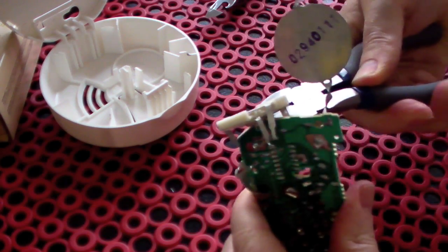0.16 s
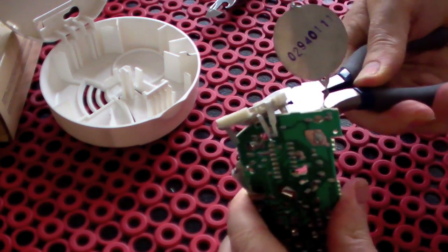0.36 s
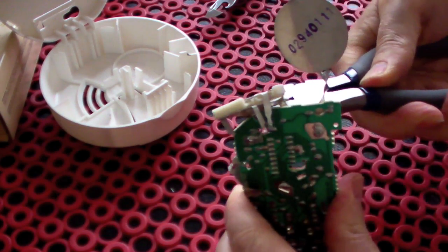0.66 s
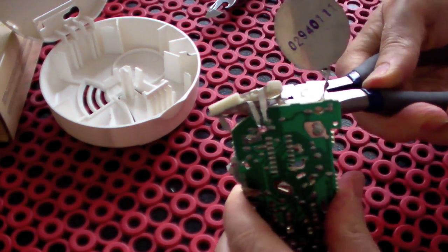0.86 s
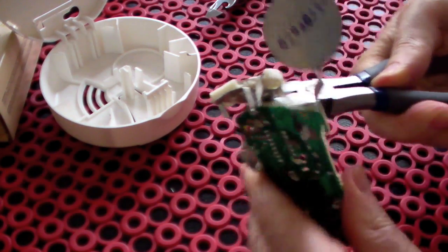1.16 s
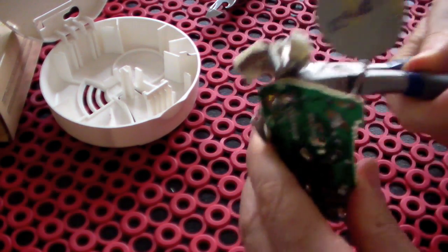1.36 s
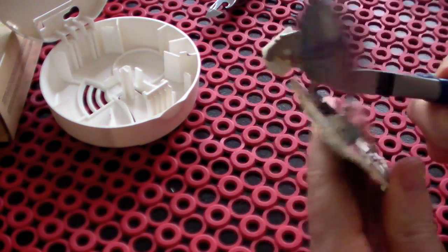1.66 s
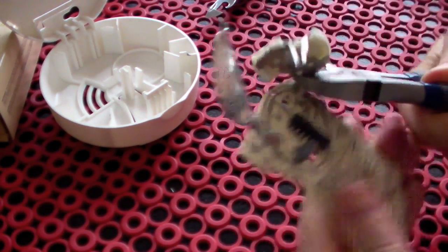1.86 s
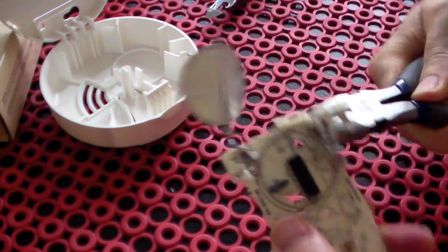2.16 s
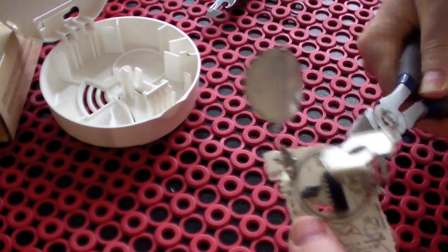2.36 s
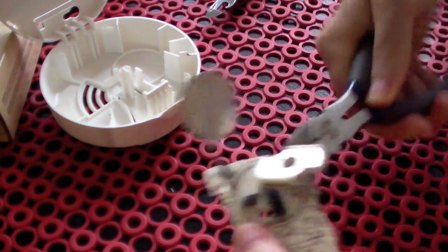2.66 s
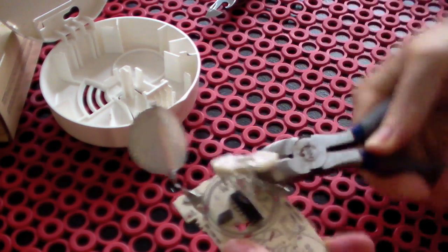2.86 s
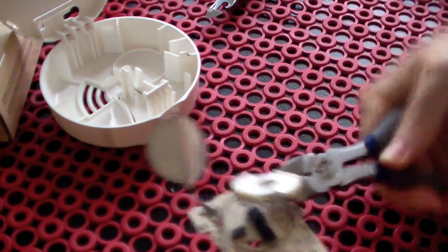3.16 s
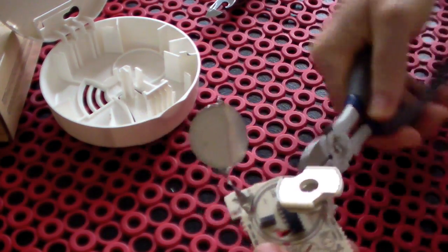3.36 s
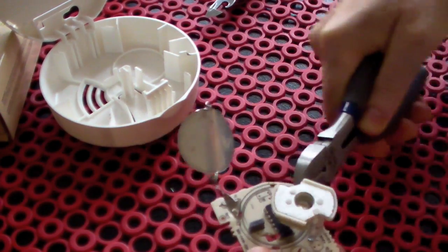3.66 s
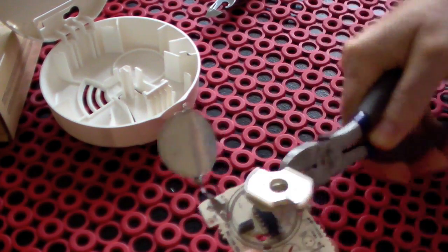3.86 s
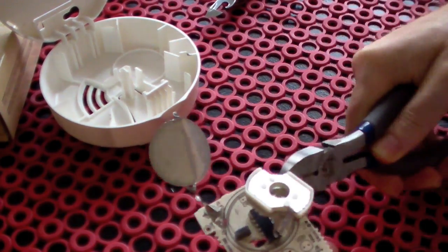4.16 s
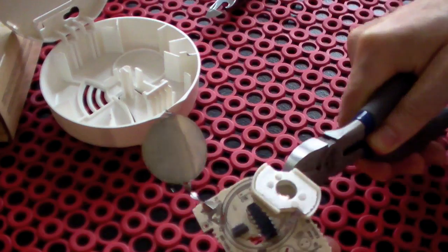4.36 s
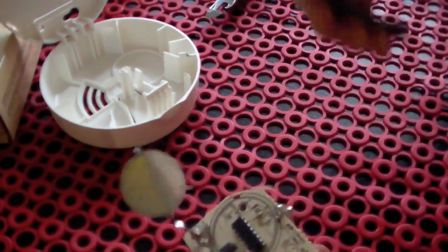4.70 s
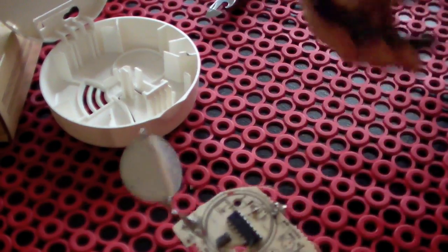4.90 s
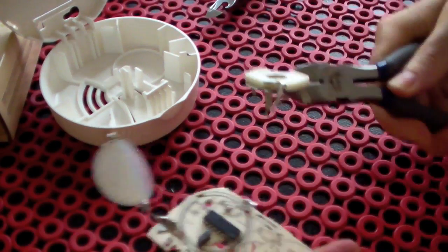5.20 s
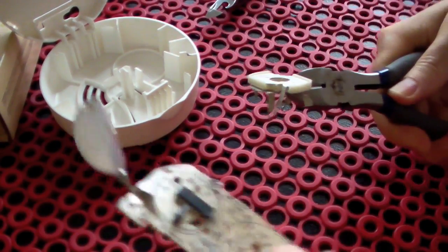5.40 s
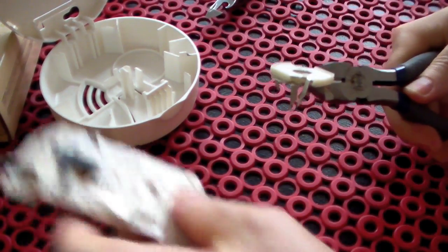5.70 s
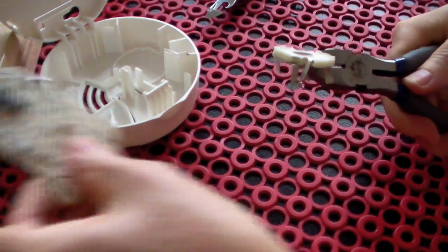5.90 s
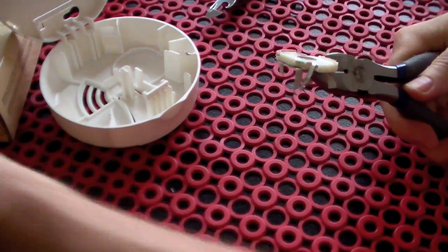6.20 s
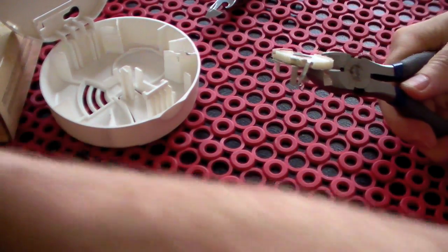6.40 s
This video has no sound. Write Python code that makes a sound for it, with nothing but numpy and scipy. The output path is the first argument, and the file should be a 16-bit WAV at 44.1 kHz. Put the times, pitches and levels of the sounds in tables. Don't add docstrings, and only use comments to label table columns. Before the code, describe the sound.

A fan drones steadily in a small room, a low hum with soft hiss and faint whine, while distant engines swell gently through the walls. Close to the microphone, light scuffs and tiny clicks start around 0.5 s, with a sharper plastic snap at 0.77. A dull knock at 0.96 leads to a gritty double click at 1.04 and some rubbing. At 1.57 a very loud crack bursts out, followed by several quick ticks. Small clicks near 1.9 precede a hard metallic jaw slip at 2.43, then a loud rattling cluster at 2.76 to 2.83 with a short thud. Ticks and knocks gather at 3.64 to 3.71, another snap at 3.86. At 4.55 plastic tears off with a bright crunch, low thud and trailing knocks. Afterwards come only a soft click near 5.0 and faint scuffs around 5.6 to 5.8, leaving fan hum and light rubbing until 6.5.

```python
import sys
import numpy as np
from scipy import signal
from scipy.fft import rfft, irfft, next_fast_len
from scipy.io import wavfile
from scipy.ndimage import uniform_filter1d, map_coordinates

SR = 44100
rng = np.random.default_rng(int(sys.argv[2]) if len(sys.argv) > 2 else 0)


def voltage_ratio(decibels):
    exponent = np.asarray(decibels, float) / 20
    return 10 ** exponent


def generate_wav(signal):
    frames = np.transpose(np.atleast_2d(signal))
    scaled = np.clip(frames, -1, 1) * 32767
    pcm = np.round(scaled).astype(np.int16)
    wavfile.write(sys.argv[1], SR, pcm)


N = 288414

# centre in Hz, width in Hz, level in dB.
PART_MODES = [(2154, 570, -1), (2932, 190, 3), (3600, 450, 0.5), (4300, 130, -0.5)]
# centre in Hz, width in Hz, level in dB.
JAW_MODES = [(5130, 1100, -6.5), (6500, 990, 0.5), (7700, 1900, -1.5), (8890, 180, 3), (9580, 610, -2.5),
             (10930, 760, 1.5), (11820, 1700, 0), (14150, 1200, 0.5), (14930, 1500, -2)]


def unit(x):
    return x / np.sqrt(np.mean(x ** 2) + 1e-20)


def along(points, hz):
    point_hz, value = np.transpose(points)
    return np.interp(np.log(hz + 1), np.log(point_hz + 1), value)


def wobble(rate_hz):
    at = np.arange(0, N + 64, 64)
    knots = rng.standard_normal(int(N * rate_hz / SR) + 4)
    return np.interp(np.arange(N), at, map_coordinates(knots, [at * rate_hz / SR]))


def filtered(x, response):
    size = next_fast_len(x.shape[-1] + 4096)
    spectrum = rfft(x, size) * response(np.fft.rfftfreq(size, 1 / SR))
    return irfft(spectrum, size)[..., :x.shape[-1]]


def modes(table, hz):
    total = 0
    for k, (centre_hz, width_hz, db) in enumerate(table):
        damping = 1j * hz * width_hz
        total = total + (-1) ** k * voltage_ratio(db) * damping / (centre_hz ** 2 - hz ** 2 + damping)
    return total


def small(hz, corner_hz):
    return (1j * hz / (corner_hz + 1j * hz)) ** 2


def add(track, start_s, sound):
    start = round(start_s * SR)
    track[..., start:start + sound.shape[-1]] += sound


def clicks():
    # time in seconds, peak in dB, ring in Hz, body level in dB.
    snaps = [(.5544, -36, 3700, -1.5), (.5926, -33, 2980, -3), (.6739, -46.5, 2010, -3),
             (.7664, -27, 5240, -4.5), (.7713, -19.5, 3350, -5.5), (1.1195, -44.5, 6000, -1),
             (1.5675, -1, 2250, -11), (1.5912, -11, 6900, -9.5), (1.9755, -20.5, 7900, -9),
             (2.3037, -27, 8300, -20), (2.7586, -15, 2500, -3.5), (3.859, -20, 8900, -11),
             (4.5535, -8, 9900, -1.5),]
    # time in seconds, peak in dB, ring in Hz, body level in dB.
    ticks = [(.5427, -32.5, 2950, -8.5), (1.2426, -39, 9550, 0.5), (1.038, -14, 2850, -2.5),
             (1.0435, -7, 7950, -6), (1.266, -46, 12500, 0), (1.488, -21.5, 8200, -5),
             (1.5744, -16, 8100, -6), (1.5944, -14, 12900, -6), (1.603, -16.5, 8900, -6),
             (1.9053, -31, 3050, -10), (2.3371, -30.5, 8700, -23), (2.4206, -11.5, 9250, -9),
             (2.4315, 3, 9150, -27.5), (2.4415, -12.5, 9100, -11), (2.4511, -25, 9240, -14.5),
             (2.702, -25.5, 8800, -10), (2.762, 2, 14100, -9), (2.7683, -11.5, 8520, -8.5),
             (2.7798, 2.5, 9200, -6.5), (2.8266, -1.5, 8400, -2), (3.2827, -30, 8340, -29),
             (3.3277, -34, 8830, -24), (3.428, -47, 13500, -3), (3.6385, -10, 6400, -13.5),
             (3.7052, -10, 3600, -12.5), (3.7088, -11, 3600, -10), (4.9672, -26, 2460, 0.5),
             (5.6718, -41, 8260, -7)]
    # time in seconds, peak in dB, ring in Hz, body level in dB.
    knocks = [(.772, -37.5, 1040, -3.5), (1.045, -22.5, 700, -5.5), (.7984, -39, 5530, -10),
              (.9458, -33.5, 3470, -2), (.9629, -18.5, 8060, -8), (1.0844, -26, 4590, -16),
              (3.5341, -27, 3600, -10), (3.6702, -18.5, 3500, -18), (3.6925, -30.5, 3710, -11.5),
              (4.5874, -17.5, 12700, -15.5), (4.6064, -22.5, 3900, -17), (4.6453, -26.5, 3860, -12),
              (4.7064, -40.5, 8000, -8), (5.0105, -38, 6970, -20), (5.0315, -42, 7740, -6),
              (5.6114, -36.5, 9600, -7.5)]
    # centre in Hz, width in Hz, level in dB.
    board_modes = [(700, 320, 1.5), (1145, 110, 5), (1585, 290, 3)]
    contacts = ((snaps, (-3, 13.5, -4)), (ticks, (-9, 2.5, 8)), (knocks, (16, 12, 5)))
    track = np.zeros((2, N + SR))
    t = np.arange(SR // 40) / SR
    for table, (board_db, part_db, jaws_db) in contacts:
        for start_s, peak_db, ring_hz, body_db in table:
            shared = rng.standard_normal(len(t))
            own = rng.standard_normal((2, len(t)))
            crack = (np.sign(shared) + .3 * own) * voltage_ratio(-60 * t / .005)
            crack[:, 0] = 7

            def body(hz):
                board = voltage_ratio(board_db) * modes(board_modes, hz) * small(hz, corner_hz=600)
                part = voltage_ratio(part_db) * modes(PART_MODES, hz) * small(hz, corner_hz=1304)
                jaws = voltage_ratio(jaws_db) * modes(JAW_MODES, hz)
                ring = voltage_ratio(3.5) * modes([(ring_hz, ring_hz / 9, 0)], hz)
                return voltage_ratio(body_db) * (board + part + jaws) + ring

            add(track, start_s + .0006, voltage_ratio(peak_db - 2.5) * filtered(crack, body))
    return track[:, :N]


def grit(rate_hz, spread_db):
    size = voltage_ratio(spread_db * np.minimum(rng.exponential(size=N), 3))
    slips = (rng.random(N) < rate_hz / SR) * size * rng.standard_normal(N)
    return unit(unit(slips) + 0.79 * rng.standard_normal((2, N)))


def tears():
    # peak time in seconds, peak in dB, resonance in Hz, t60 in seconds, tilt in dB per octave.
    splits = [(0.9632, -26, 855, .028, -1.5), (1.047, -24, 732, .071, 4.5), (1.571, -19.5, 2340, 0.08, 2),
              (1.598, -24.5, 13100, 0.066, -1.5), (2.435, -24, 8940, .14, 2.5),
              (2.764, -25, 4200, .16, -6.5), (2.783, -23, 9070, 0.071, 13.5),
              (2.827, -19.5, 4100, .069, 2.5), (2.87, -40, 4300, .46, -1.5), (3.718, -43, 12000, 0.2, 18.5),
              (3.875, -45.5, 4000, .06, -1), (4.546, -32, 6500, .1, 0.5),
              (4.5543, -10.5, 1454, 0.016, -5.5), (4.5555, -4, 9920, 0.018, 6), (4.559, -11, 6500, .05, 2),
              (4.566, -19.5, 13000, 0.11, 14.5), (4.6, -35.5, 3600, 0.38, -1.5),
              (4.812, -51, 795, .14, -13), (5.219, -51.5, 900, 0.18, -9)]
    # peak time in seconds, peak in dB, resonance in Hz, t60 in seconds.
    scuffs = [(.005, -48, 8200, .1), (.12, -56, 9000, .07), (.375, -51.5, 9000, .1), (.44, -53.5, 8000, .1),
              (.775, -45, 3000, 0.15), (0.961, -35, 700, 0.12), (1.04, -30, 5380, 0.15),
              (1.05, -21.5, 6050, 0.071), (1.186, -37.5, 7700, 0.11), (1.243, -38, 9580, 0.039),
              (1.86, -45, 8300, 0.38), (1.911, -44.5, 2800, 0.062), (1.977, -37.5, 6170, .15),
              (2.08, -50.5, 3600, 0.11), (2.319, -47, 8600, .16), (2.412, -38, 7900, 0.049),
              (3.29, -48.5, 8380, .16), (3.332, -42.5, 8600, .1), (3.669, -31, 3500, .04),
              (3.7092, -22.5, 3620, 0.024), (3.847, -39.5, 8400, .1), (4.15, -52, 10300, 0.16),
              (4.35, -55.5, 10330, 0.28), (4.455, -53.5, 10600, .1), (4.969, -42, 2400, 0.084),
              (5.616, -37, 8900, 0.087), (5.682, -43, 8200, .085), (5.739, -49.5, 3480, 0.094),
              (5.77, -49, 3430, .15), (5.8, -49, 8170, .16)]
    # rise time over t60, prominence of the resonance in dB
    events = [(*row, 0.061, 12) for row in splits]
    for row in scuffs:
        tilt_db = -0.3 + 1.8 * np.log2(row[2] / 5000)
        events.append((*row, tilt_db, .22, 8))

    track = np.zeros((2, N + 2 * SR))
    t = np.arange(SR * 2 // 5) / SR - .1
    slips = np.pad(grit(rate_hz=2500, spread_db=-1.5), ((0, 0), (SR, SR)), "reflect")
    bodies = filtered(slips, lambda hz: (modes(PART_MODES, hz) + modes(JAW_MODES, hz))
                      * small(hz, corner_hz=1188))
    for peak_s, peak_db, centre_hz, t60_s, tilt_db, rise, ring_db in events:
        start_s = peak_s + .9

        def colour(hz):
            tilt = voltage_ratio(tilt_db * np.log2(hz / 5000 + 0.083))
            ring = voltage_ratio(ring_db) * modes([(centre_hz, 0.038 * centre_hz, 0)], hz)
            return np.array([[tilt], [ring]])

        start = round(start_s * SR)
        pair = np.array([x[:, start:start + len(t)] for x in (bodies, slips)])
        sound = unit(filtered(pair, colour).sum(axis=0))
        shape_db = np.where(t < 0, 20 * t / (rise * t60_s), -60 * t / t60_s)
        add(track, start_s, voltage_ratio(peak_db + shape_db) * sound)
    return track[:, SR:SR + N]


def rings():
    # start in seconds, frequency in Hz, level in dB, t60 in seconds.
    free_rings = [(2.83, 1990, -30.5, 0.16), (.773, 5600, -39.5, 0.097), (3.669, 3550, -25.5, 0.033),
                  (3.707, 3500, -20.5, 0.042), (.963, 744, -18.5, 0.019), (1.57, 3400, -41, 0.31),
                  (3.707, 6500, -49, 0.069), (3.707, 4700, -40, .09), (4.808, 1620, -44, 0.1),
                  (4.5545, 760, -17.5, 0.016), (4.5545, 1000, -19, 0.018), (4.556, 2920, -47, 0.13),
                  (4.556, 4000, -35.5, 0.14), (2.433, 5700, -46, .08), (3.639, 4800, -51, .04)]
    # start in seconds, frequency in Hz, level in dB, t60 in seconds.
    thuds = [
        (4.588, 97, -17.5, 0.13),
        (4.592, 178, -29.5, 0.13),
        (2.78, 100, -21, 0.039),
        (2.781, 455, -13, 0.013),
    ]
    track = np.zeros(N + SR)
    t = np.arange(SR // 2) / SR
    for start_s, hz, db, t60_s in free_rings + thuds:
        drift = np.cumsum(rng.standard_normal(len(t))) * hz * 8e-6
        onset = 1 - np.exp(-t * hz)
        add(track, start_s, voltage_ratio(db - 60 * t / t60_s) * onset * np.sin(2 * np.pi * hz * t + drift))
    return track[:N]


def scrape():
    # time in seconds, level in dB.
    effort = [(0, -62), (.5, -77), (.9, -59), (1.13, -45.5), (1.3, -72), (1.8, -57), (2.05, -51.5),
              (2.2, -65.5), (2.65, -59.5), (2.9, -43), (3.05, -61), (3.5, -56.5), (3.95, -70),
              (4.45, -55.5), (4.7, -57), (4.9, -68.5), (5.55, -56.5), (6.54, -55)]
    effort_db = np.interp(np.arange(N) / SR, *np.transpose(effort))
    dull_db = -62 + 1.3 * (effort_db + 60.5)
    flutter_db = 3.3 * wobble(40)
    bright = unit(filtered(grit(rate_hz=5500, spread_db=-0.5), lambda hz: modes(JAW_MODES, hz)))
    dull = unit(filtered(grit(rate_hz=840, spread_db=2.5), lambda hz: modes(PART_MODES, hz)))
    return voltage_ratio(effort_db + flutter_db - 8.5) * bright + voltage_ratio(dull_db + flutter_db - 10.5) * dull


def fan():
    # frequency in Hz, level in dB per Hz.
    air_points = [(18, -49.5), (30, -17.5), (184, -14), (287, -15.5), (437, -3.5), (569, -20), (632, -21.5),
                  (702, -23), (1010, -22.5), (2060, -31), (2290, -32.5), (3400, -31), (5740, -34.5),
                  (6380, -32), (16000, -39.5)]
    # frequency in Hz, correlation (-1 to 1).
    alike_points = [(60, 0.89), (180, 0.94), (550, 1), (1650, 0.84), (4970, -0.28), (15000, -0.23)]
    # frequency in Hz, left minus right in dB.
    lean_points = [(60, -2), (240, -2.5), (950, -2.5), (3770, -1), (15000, 2)]
    # frequency in Hz, level in dB, wander in Hz.
    drone = [(459.7, -50.5, 3.38), (433, -60.5, 8.12), (258.7, -64, 3), (386.6, -61, 20)]
    # centre in Hz, width in Hz, level in dB.
    whine_modes = [(6400, 440, -9.5), (2040, 52.3, -9)]

    def mid_side(hz):
        angle = np.arccos(np.clip(along(alike_points, hz), -1, 1)) / 2
        return voltage_ratio(along(air_points, hz)) * [np.cos(angle), np.sin(angle)]

    mid, side = filtered(rng.standard_normal((2, N)), mid_side)
    air = voltage_ratio(-47.5 + 0.29 * wobble(1.2)) * unit(np.array([mid + side, mid - side]))
    tones = np.zeros(N)
    for hz, db, wander_hz in drone:
        phase = 2 * np.pi * np.cumsum(hz + wander_hz * wobble(13)) / SR
        tones += voltage_ratio(db + 1.3 * wobble(5.4)) * np.sin(phase)
    whine_noise = filtered(rng.standard_normal((2, N)), lambda hz: modes(whine_modes, hz) ** 2)
    whine = voltage_ratio(-67.5) * unit(whine_noise)
    return filtered(air + tones + whine, lambda hz: voltage_ratio(along(lean_points, hz) * [[.5], [-.5]]))


def traffic():
    # time in seconds, upper tone in dB, lower tone in dB, length in seconds.
    passes = [
        (.51, -49, -52.5, 0.36),
        (1.25, -52.5, -60, 1.6),
        (2.13, -43.5, -59, 0.31),
        (2.48, -48, -52, 0.52),
        (2.8, -52.5, -60.5, 0.37),
        (3.44, -66, -48.5, 0.39),
        (4.62, -44, -47, 0.2),
        (4.74, -46.5, -63, 0.14),
        (6.28, -75, -57, 1.2),
    ]
    pass_s, upper_db, lower_db, length_s = np.transpose(passes)[:, :, None]
    fade_db = -25.5 * np.abs(np.arange(N) / SR - pass_s) / length_s
    total = np.zeros(N)
    for hz, peak_db, steady_db in ((190, upper_db, -67), (98, lower_db, -74)):
        level_db = np.maximum((peak_db + fade_db).max(axis=0), steady_db)
        tone = np.sin(2 * np.pi * np.cumsum(hz * (1 + .03 * wobble(9))) / SR)
        total += voltage_ratio(level_db - 4.5 + 1.2 * wobble(4.3)) * tone
    return total


def room(x):
    # frequency in Hz, t60 in seconds.
    t60_points = [(300, 0.63), (3500, 0.35), (6000, 0.34), (14000, 0.13)]
    wet = np.zeros((2, N + SR))
    for start in range(0, N, SR // 4):
        hz, t, z = signal.stft(rng.standard_normal((3, SR // 2)), SR, nperseg=256)
        decay = voltage_ratio(-60 * t / along(t60_points, hz)[:, None])
        shared, *own = signal.istft(z * decay, SR, nperseg=256)[1]
        tail = (shared + 0.65 * np.array(own)) / np.linalg.norm(shared)
        add(wet, start / SR + .003, signal.fftconvolve(x[None, start:start + SR // 4], tail, axes=1))
    return wet[:, :N]


def smear(x, noise_db):
    hop_s, first_s = 1024 / 48000, .0075
    size = 2 * round(hop_s * SR)
    starts_s = first_s + hop_s * np.arange(int(N / SR / hop_s) - 2)
    at = np.round(starts_s * SR).astype(int)[:, None] + np.arange(size)
    window = np.sin(np.pi * (np.arange(size) + .5) / size)
    power = np.abs(rfft(x[:, at] * window)) ** 2
    coarse = np.abs(small(np.fft.rfftfreq(size, 1 / SR), corner_hz=497))
    step = coarse * np.sqrt(np.abs(uniform_filter1d(power, size=16)) / size)
    noise = irfft(step * rfft(rng.standard_normal((2, *at.shape))), size) * window
    return x + voltage_ratio(noise_db) * np.array([np.bincount(at.ravel(), n.ravel(), N) for n in noise])


def scene():
    lead_s = 2e-5
    work = (clicks() + tears()) * voltage_ratio([[-.4], [.4]]) + rings() * voltage_ratio([[-1.2], [1.2]])
    ports = filtered(work, lambda hz: np.exp(1j * np.pi * hz * lead_s * np.array([[1], [-1]])))
    tail = voltage_ratio(-17.5) * room(work.mean(axis=0))
    return ports + tail + scrape() + fan() + traffic() * voltage_ratio([[-1.1], [1.1]])


def band_limit(x):
    return signal.sosfilt(signal.butter(12, 16430, fs=SR, output="sos"), x)


def record(dry):
    smeared = smear(np.clip(dry, -1, 1), noise_db=-5.5)
    camera = filtered(smeared, lambda hz: np.where(hz < 15850, 1, voltage_ratio(-21)))
    return band_limit(np.clip(camera, -1, 1))


dry = scene()
out = record(dry)
generate_wav(out)
```